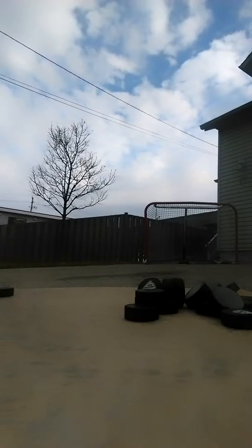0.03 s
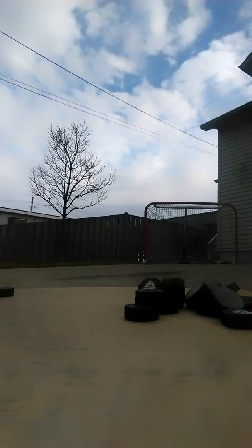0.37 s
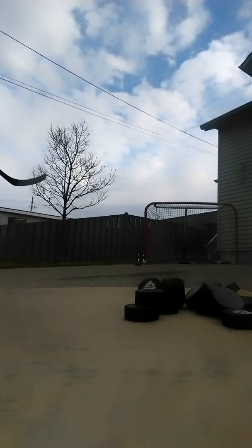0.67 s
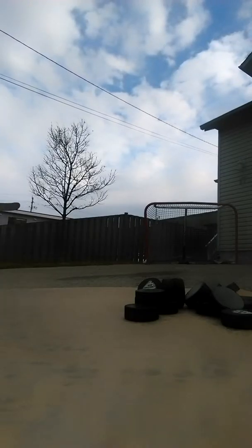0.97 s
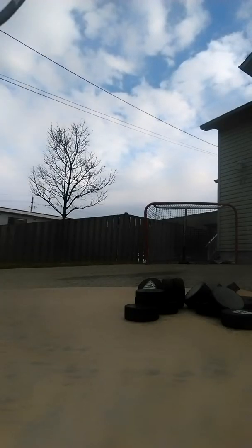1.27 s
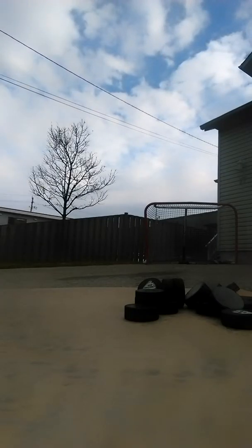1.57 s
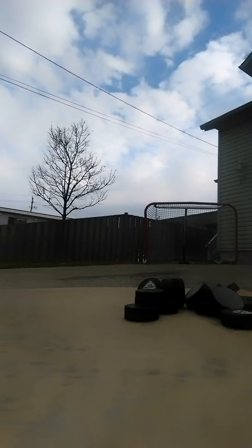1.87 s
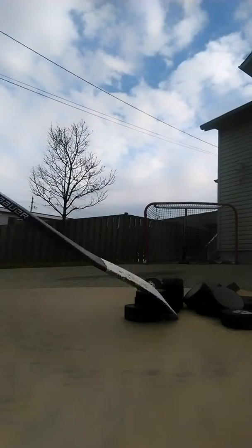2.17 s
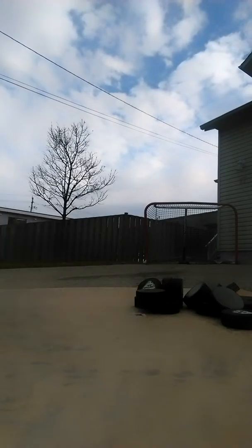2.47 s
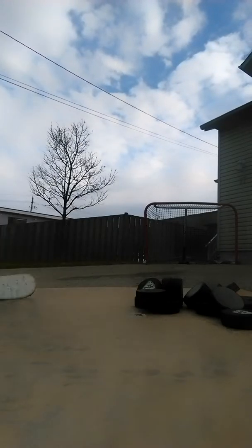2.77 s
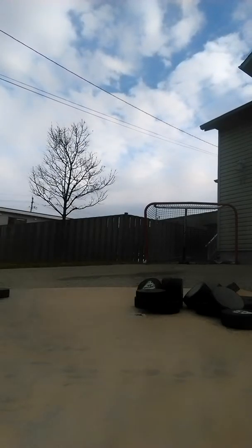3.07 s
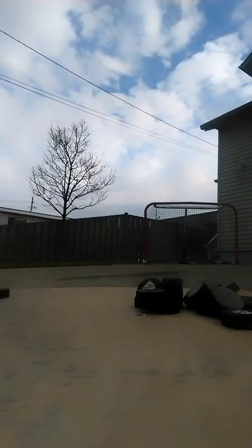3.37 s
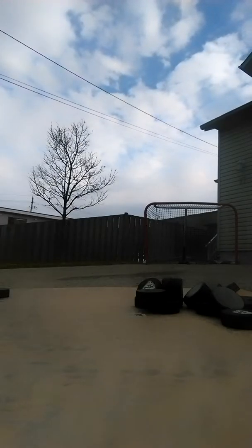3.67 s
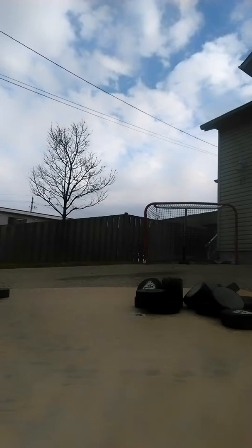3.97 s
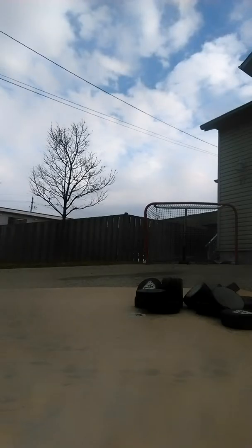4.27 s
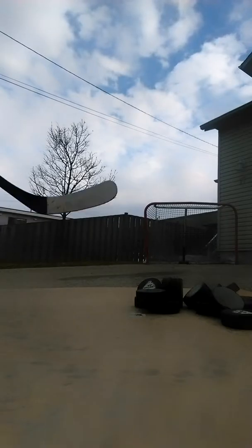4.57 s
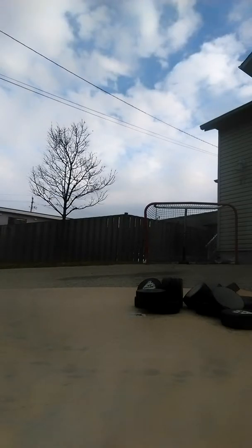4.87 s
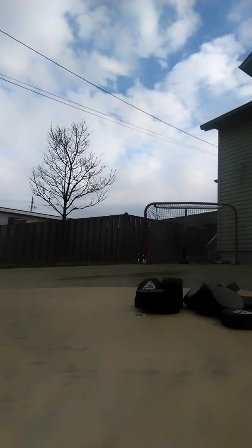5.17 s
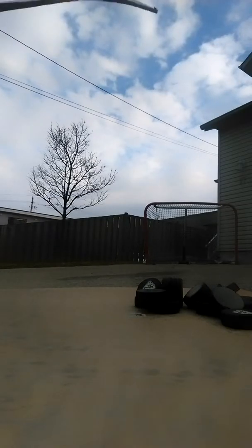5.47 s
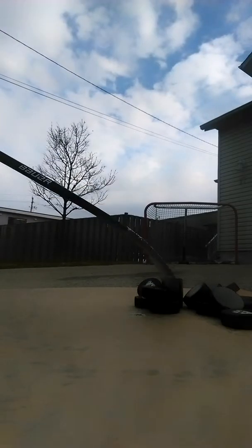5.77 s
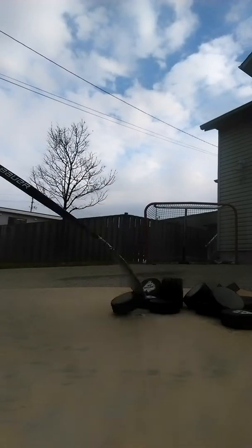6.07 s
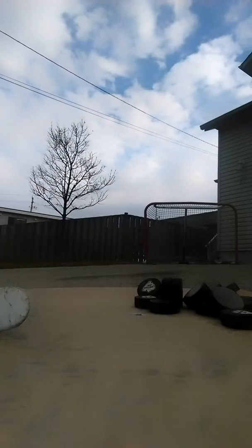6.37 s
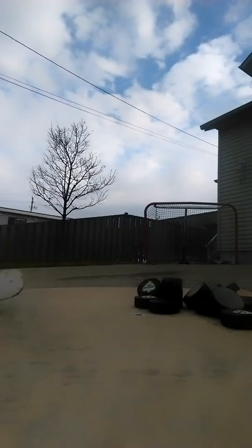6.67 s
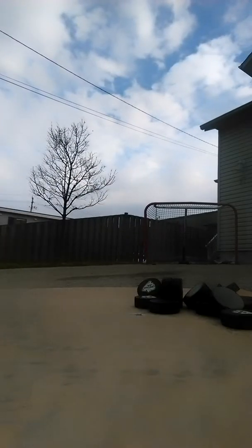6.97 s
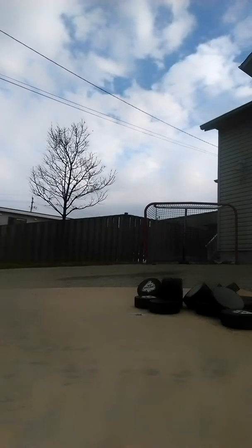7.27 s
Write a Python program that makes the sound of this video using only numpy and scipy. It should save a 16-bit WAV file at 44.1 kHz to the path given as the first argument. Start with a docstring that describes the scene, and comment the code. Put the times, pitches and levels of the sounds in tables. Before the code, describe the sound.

Heard from ground level in a fenced yard, a hockey stick fires two sharp slap shots a few seconds apart, each echoing briefly and followed by the clang of a puck on the steel goal. After each shot, the blade taps pucks off a pile with dull thuds and scrapes them across a shooting board. Sleeves rustle softly, while low town rumble, far traffic and a slight breeze lie underneath.

```python
"""Hockey practice in a fenced yard

Two microphones at ground level, beside a pile of pucks. Close up, the blade knocks pucks off the pile
and drags them over a shooting board on the concrete, while sleeves and gloves rustle. Two slap shots
crack and come back from house and fence; a stray puck clangs on steel. A light breeze stirs at the
microphones, over low town rumble and far traffic."""
import sys
import numpy as np
from scipy import signal
from scipy.fft import rfft, irfft
from scipy.io import wavfile
from scipy.ndimage import uniform_filter1d

SR = 44100
rng = np.random.default_rng(int(sys.argv[2]) if len(sys.argv) > 2 else 0)


def log_audio(samples):
    """Write samples as a 16-bit WAV file to the path given in sys.argv[1]."""
    # one column per channel
    frames = np.atleast_2d(samples).T
    # limit to full scale, then quantise
    limited = np.clip(frames, -1, 1)
    pcm = np.round(limited * 32767).astype(np.int16)
    wavfile.write(sys.argv[1], SR, pcm)


N = 327663
TIME = np.arange(N) / SR
SIZE = 8192  # samples in one short hit
HZ, AGE = np.fft.rfftfreq(SIZE, 1 / SR), np.arange(SIZE) / SR
IMPULSE = 1. * (AGE == 0)


def amp(db):
    """Decibels to gain."""
    return 10 ** (np.asarray(db) / 20)

def unit_rms(x):
    """Scales to rms 1."""
    return x / np.sqrt(np.mean(x ** 2) + 1e-20)

def unit_hit(x):
    """Scales to the energy of 10 ms at rms 1."""
    return x / np.sqrt(np.mean(np.sum(x ** 2, -1)) / (SR / 100) + 1e-20)

def spectrum(points, hz=HZ):
    """Reads a table on a log-frequency axis."""
    f, value = np.transpose(points)
    return np.interp(np.log(hz + 1), np.log(f), value)

def fader(points):
    """Gain over time from a table of levels."""
    return amp(np.interp(TIME, *np.transpose(points)))

def add(mix, start_s, sound):
    """Mixes a sound in."""
    part = mix[..., round(start_s * SR):][..., :sound.shape[-1]]
    part += sound[..., :part.shape[-1]]

def colour(x, db):
    """Causal filter with the gain db at the frequencies HZ."""
    log_gain = np.log(amp(np.r_[db, db[-2:0:-1]]))
    taps = np.fft.ifft(np.exp(signal.hilbert(log_gain).conj())).real[:SIZE // 2]
    return signal.fftconvolve(x, taps[None], axes=1)[:, :x.shape[1]]

def mic_noise(length, shared):
    """White noise at two microphones that share part of its power."""
    left, right, common = rng.standard_normal((3, length))
    return np.sqrt(shared) * common + np.sqrt(1 - shared) * np.array([left, right])

def whiten(x):
    """Evens out the broad colour of a burst and keeps its fine grain."""
    bins = rfft(x)
    return irfft(bins / np.sqrt(uniform_filter1d(abs(bins) ** 2, size=240) + 1e-12))

def wander():
    """An irregular sway, strongest at its slowest rates."""
    rates_hz = np.geomspace(.8, 14, 20)
    return unit_rms(sum(np.sin(2 * np.pi * (f * TIME + rng.random())) / np.sqrt(f) for f in rates_hz))

def snaps(per_s, spread_db, cap):
    """Sparse clicks, a few much louder than the rest."""
    clicks = rng.standard_normal(N) * (rng.random(N) < per_s / SR)
    return unit_rms(clicks * amp(spread_db * np.minimum(rng.exponential(1, N), cap)))


# Town air around the yard: f/Hz, level/dB
TOWN_SPECTRUM = [(15, -39), (25, -35.5), (75, -2.5), (188, -8), (209, -9), (267, -9), (421, -17),
                 (457, -14), (648, -21), (848, -18.5), (1080, -23), (1570, -23), (3530, -31),
                 (15500, -68.5)]

def town_rumble(level_db=-44, sway_db=2.5):
    """The town's low rumble, almost the same at both microphones."""
    rumble = unit_rms(colour(mic_noise(N, shared=.95), spectrum(TOWN_SPECTRUM)))
    return rumble * amp(level_db + sway_db * wander())


# Tyres in the distance: f/Hz, level/dB
TYRE_SPECTRUM = [(100, -11), (500, -3.5), (1100, 1), (1700, -7), (3500, -22), (9000, -41)]
# Their roar as it reaches the yard: t/s, level/dB
TRAFFIC_LEVELS = [(0, -41), (.3, -41), (1.2, -45.5), (1.6, -52), (2.8, -50.5), (4.8, -53), (5.6, -57.5),
                  (7.43, -57)]

def far_traffic():
    """Tyre roar far off, fading away."""
    return unit_rms(colour(mic_noise(N, shared=.56), spectrum(TYRE_SPECTRUM))) * fader(TRAFFIC_LEVELS)


# Air stirring right at the microphones: f/Hz, level/dB
BREEZE_SPECTRUM = [(20, -14), (45, 0.5), (75, -5), (160, -18.5), (500, -39.5)]

def breeze(level_db=-54, gust_db=3.5):
    """Light gusts buffet each microphone with its own low noise."""
    buffet = unit_rms(colour(mic_noise(N, shared=0), spectrum(BREEZE_SPECTRUM)))
    return buffet * amp(level_db - gust_db * wander())


def hollow_note(at_s=3.597, hz=332, level_db=-35, width_s=.02):
    """A faint, brief hollow note, dead centre."""
    swell = np.exp(-((TIME - at_s) / width_s) ** 2)
    return amp(level_db) * swell * np.sin(2 * np.pi * hz * TIME)


# Single echoes off house and fence: delay/s, level/dB
WALL_ECHOES = [(0.0626, -12), (.090, -13.5)]
# Decay of the yard's tail: f/Hz, t60/s
YARD_DECAY = [(150, 0.61), (1000, 1.05), (3000, .85), (7000, 0.56), (14000, 0.18)]
# Colour of all the yard sends back: f/Hz, level/dB
YARD_SPECTRUM = [(80, -13.5), (400, 4.5), (800, 2.5), (1500, 3), (2800, -2.5), (6000, -1), (14000, -10)]

def yard_echo(sent, first_s=.052, hold_s=.09, lumps_db=1.5):
    """The nearest wall answers late; fence boards and siding then scatter a long lumpy tail."""
    lumps = unit_rms(uniform_filter1d(rng.standard_normal(SR), size=150))
    reflections = mic_noise(SR, shared=.39) * (rng.random(SR) < .12) * amp(lumps_db * lumps)
    hz, age, bands = signal.stft(reflections, SR, nperseg=256)
    decay = amp(-60 * np.maximum(age - first_s - hold_s, 0) / spectrum(YARD_DECAY, hz)[:, None])
    tail = signal.istft(bands * decay, SR, nperseg=256)[1][:, :SR]
    tail *= np.where(TIME[:SR] < first_s, .15, 1)
    tail /= np.linalg.norm(tail[0])
    for delay, db in WALL_ECHOES:
        slap = mic_noise(SIZE, shared=.5) * np.exp(-AGE / .0013)  # rough siding smears each echo
        add(tail, delay, amp(db) * slap / np.linalg.norm(slap[0]))
    return colour(signal.fftconvolve(sent, tail, axes=1)[:, :N], spectrum(YARD_SPECTRUM))


# Cloth heard close up: f/Hz, level/dB
CLOTH_SPECTRUM = [(1000, -20), (3500, 2), (7000, 3.5), (10000, -5), (13000, 8.5), (15500, -1)]
# Sleeves and gloves as the stick is moved: t/s, level/dB
RUSTLE_LEVELS = [(0, -48), (.1, -78), (.39, -63), (.455, -40), (.5, -53), (1.1, -60), (1.45, -64),
                 (1.55, -57), (1.8, -62.5), (2.0, -62), (2.85, -65), (2.98, -57), (3.1, -69), (3.6, -65),
                 (3.76, -60), (3.88, -49.5), (4.25, -58), (4.35, -61), (4.55, -68), (4.68, -59), (4.8, -79),
                 (5.85, -69), (5.96, -49), (6.2, -48), (6.52, -44.5), (6.6, -54), (6.87, -57), (6.95, -72),
                 (7.43, -59.5)]

def sleeve_rustle(snap_gain=.37):
    """Brushing cloth gives a fine hiss with sparse little snaps."""
    brush = snap_gain * snaps(per_s=150, spread_db=5, cap=3) + mic_noise(N, shared=.1)
    return unit_rms(colour(brush, spectrum(CLOTH_SPECTRUM))) * fader(RUSTLE_LEVELS)


def shifting_resonances(x, depth_db=3.2):
    """Resonances come and go as the contact point moves."""
    bands = signal.stft(x, SR, nperseg=512)[2]
    patches = uniform_filter1d(rng.standard_normal(bands.shape[1:]), size=9, axis=0)
    patches = unit_rms(uniform_filter1d(patches, size=9, axis=1))
    return signal.istft(bands * amp(depth_db * patches), SR, nperseg=512)[1][:, :N]


# Grit under the blade: f/Hz, level/dB
SCRAPE_SPECTRUM = [(60, 6), (280, -10.5), (600, -4.5), (1200, -5), (2700, 2.5), (4200, -7.5), (6500, -11.5),
                   (8500, -11.5), (9600, -20), (10900, -24), (11900, -20), (15500, -8)]
# The blade dragging over the ground near the microphones: t/s, level/dB
DRAG_LEVELS = [(.36, -95), (.42, -58), (.47, -39), (.49, -87), (2.08, -93), (2.12, -58), (2.16, -43),
               (2.20, -25), (2.27, -26.5), (2.34, -28.5), (2.435, -31.5), (2.445, -59), (2.48, -37.5),
               (2.57, -35), (2.69, -39.5), (2.80, -47.5), (2.9, -73), (3.0, -114), (4.28, -95), (4.34, -42),
               (4.41, -62), (4.48, -90), (5.86, -93), (5.95, -48), (6.02, -56), (6.06, -35), (6.13, -37),
               (6.19, -42), (6.25, -34), (6.37, -33), (6.41, -38.5), (6.54, -44), (6.68, -48), (6.8, -70),
               (6.9, -95)]

def blade_drag(judder_db=1.3, rasp_db=-10, rasp_hz=10100):
    """Grit snaps under the sliding blade, which judders a little; the finest grains rasp high up."""
    grains = snaps(per_s=2000, spread_db=4, cap=4)
    judder = unit_rms(uniform_filter1d(uniform_filter1d(rng.standard_normal(N), size=400), size=200))
    contact = .7 * grains + mic_noise(N, shared=.15)
    rasp = signal.lfilter(*signal.iirpeak(rasp_hz, Q=5, fs=SR), contact)
    rub = unit_rms(colour(contact, spectrum(SCRAPE_SPECTRUM))) + amp(rasp_db) * unit_rms(rasp)
    return unit_rms(shifting_resonances(rub)) * fader(DRAG_LEVELS) * amp(judder_db * judder)


# Modes of the steel tube: f/Hz, level/dB, t60/s
STEEL_MODES = [(1098, 8, .55), (1065, -5, 1), (1143, 11, .35), (1185, -19, 0.31), (1232, 5, 0.31),
               (1320, -7, 0.28), (1466, 4, 0.32), (1728, -8, 0.84), (2950, -14, .18), (3090, -5, 0.81),
               (3220, -9, 0.27), (3730, -14, 0.48), (4151, -16, 0.29), (4500, -14, .2), (5710, -8, .22),
               (6340, -16, 0.24)]
# Puck on steel: t/s, level/dB
STEEL_HITS = [(.984, -21), (1.056, -23.5), (5.031, -15.5)]

def steel_clangs(onset_db=7, onset_t60=.29):
    """Struck steel, loud at first, then ringing on; each mode meets the microphones out of step."""
    t = TIME[:SR]
    onset = 1 + amp(onset_db - 60 * t / onset_t60)
    clangs = np.zeros((2, N))
    for start_s, level_db in STEEL_HITS:
        ring = np.zeros((2, SR))
        for hz, db, t60 in STEEL_MODES:
            phase = rng.random() + rng.random((2, 1)) / 2
            ring += amp(db - 60 * t / t60) * np.sin(2 * np.pi * (hz * t + phase))
        add(clangs, start_s, amp(level_db) * unit_hit(ring * onset))
    return clangs


# Low bass bumps as the slap shots overload the microphones: t/s, level/dB, left against right/dB
SHOT_BASS_BUMPS = [(0.475, -22, -12), (.498, -19, 0), (3.912, -32, 8), (3.936, -31, -15)]

def bass_bumps(rise_s=.0023):
    """Each bump is one slow swing of the signal, unequal left and right."""
    age = AGE / rise_s
    swing = unit_hit(age * (2 - age) * np.exp(-age))
    bumps = np.zeros((2, N))
    for start_s, db, left_db in SHOT_BASS_BUMPS:
        add(bumps, start_s, amp(db) * swing * amp([[left_db], [0]]))
    return bumps


# The shooting board, mostly in the right microphone: f/Hz, level/dB
BOARD_SPECTRUM = [(40, -51.5), (75, -11), (125, -2), (290, -2), (420, -5.5), (700, -12), (1400, -23.5),
                  (2250, -20), (2750, -25), (3250, -24), (4000, -36.5), (9000, -47)]

def board_thud(first_s=.00343, last_s=.067, edge_db=-9, t60=.4, left_db=-19, returns=9):
    """Bending waves in the board: highs outrun lows, and the edges send them round again."""
    delays = np.r_[first_s, rng.uniform(2 * first_s, last_s, returns)]  # travel times at 300 Hz
    gains = np.r_[1, amp(edge_db - 60 * delays[1:] / t60) * rng.choice([-1, 1], returns)]
    waves = gains @ np.exp(-4j * np.pi * delays[:, None] * np.sqrt(300 * HZ))
    return unit_hit(irfft(waves * amp(spectrum(BOARD_SPECTRUM)))) * amp([[left_db], [0]])


# Modes of the stick's blade: f/Hz, level/dB, t60/s
BLADE_MODES = [(426, -2, 0.037), (669, 1, 0.046), (914, 2.5, 0.056), (1324, 0.5, 0.074), (1528, 6, 0.039),
               (2253, 10, .02), (3314, 5.5, 0.027), (4260, 5, 0.014)]

def blade_ring(grit, detune=.082):
    """The struck blade rings, tuned a little differently each time; grit scatters the phases."""
    ring = np.zeros((2, SIZE))
    for hz, db, t60 in BLADE_MODES:
        cycles = hz * (1 + detune * rng.uniform(-.84, 1)) * AGE + grit * rng.random((2, 1))
        ring += amp(db - 60 * AGE / t60) * np.sin(2 * np.pi * cycles)
    return unit_hit(ring)


def tilt(db_per_octave):
    """Hard contacts are brighter than soft ones: dB at the frequencies HZ."""
    return db_per_octave * np.log2(np.maximum(HZ, 450) / 1500)


# The crack of a blow: f/Hz, level/dB
CRACK_SPECTRUM = [(40, -27), (150, -10.5), (400, -1), (900, 4.5), (1500, -0.5), (2700, 2.5), (4000, -9.5),
                  (6500, -17), (10000, -19.5), (15500, -22)]

def direct_crack(brightness, contact_s, grit, ring_db=-5, scatter_db=-11, scatter_t60=.09):
    """A clean push and a crunch of grit, with the blade's ring; things close by scatter the crack."""
    crunch = unit_hit(whiten(mic_noise(SIZE, shared=.18) * np.exp(-(AGE / contact_s) ** 2)))
    force = np.sqrt(grit) * crunch + np.sqrt(1 - grit) * unit_hit(IMPULSE)
    ring = amp(ring_db) * blade_ring(grit)
    scatter = unit_hit(mic_noise(SIZE, shared=.091) * amp(-60 * AGE / scatter_t60))
    crack = unit_hit(colour(force + amp(scatter_db) * scatter, spectrum(CRACK_SPECTRUM)))
    return unit_hit(colour(crack + ring, tilt(brightness)))

def radiated_crack(brightness):
    """The crack sent into the yard: summed over all directions, its spectrum is smooth."""
    return unit_hit(colour(IMPULSE[None], spectrum(CRACK_SPECTRUM) + tilt(brightness)))


# Knocks, cracks and scuffs of stick and puck, close by and farther off on net, fence or steel:
# t/s, level/dB, brightness/(dB per octave), contact/s, grit/0-1, board thud/dB, echo against level/dB
STICK_AND_PUCK_HITS = [(0.3299, -23.5, -4.5, 0.0021, 0.7, -50, -8.5),
                       (0.339, -23.5, -0.5, 0.0095, 0.75, -58, -12),
                       (0.3445, -27, 8, 0.0028, 0.87, -55, -15),
                       (0.4753, -10, 4.5, .004, 0.99, -20.5, -0.5),
                       (.481, -12.5, 0.5, 0.011, 0.9, -41, -30), (0.4975, -7, 1, 0.0019, 0.97, -24, -37),
                       (.5657, -20, -2, 0.0027, 0.46, -40, -16), (.623, -26.5, -3.5, 0.0017, 0.14, -35, -6),
                       (0.8613, -19, 1, 0.002, 0.96, -27.5, 3), (0.983, -19.5, -7, 0.012, 0.6, -42, -32),
                       (1.054, -22.5, -5, 0.0031, .8, -35, -29), (1.505, -36.5, 0, .002, 0.88, -59, -0.5),
                       (1.532, -36.5, 2, 0.014, 1, -56, -17), (1.5391, -29, 7.5, 0.0012, 0.97, -59, -25),
                       (2.0847, -16, 1, 0.0043, 0.8, -14, -14), (2.163, -25, -2.5, 0.0056, 1, -25, -29),
                       (2.170, -29, -7, .003, 0.2, -14.5, -33), (2.204, -24.5, -1, 0.0034, 1, -11.5, -30),
                       (2.262, -33, 2, 0.0011, 1, -19.5, -24), (2.4373, -18.5, -5, 0.0012, 0.88, -54, -12),
                       (2.467, -38, -15, 0.0045, 1, -35, -3), (2.483, -30.5, -2, 0.0024, 0.9, -30.5, -20),
                       (2.520, -29, -6.5, 0.013, 1, -32, -7.5), (2.687, -28, 0, 0.024, 1, -34, -11.5),
                       (3.158, -45, 1, 0.00078, 0.3, -65, -10), (3.749, -27, -2.5, 0.022, 1, -44, -24),
                       (3.763, -22.5, 0.7, 0.022, 0.86, -36, -11),
                       (3.9128, -10, 2.7, 0.0015, 0.99, -20, -5), (3.935, -17.5, 2, 0.002, 0.77, -31, -12),
                       (4.062, -28, -5.5, .003, 0.06, -35, -15), (4.24, -34, 3.5, 0.0072, .9, -30.5, -1),
                       (4.332, -38, 8.5, 0.0044, .9, -57, -6), (4.380, -30, -1.5, 0.042, 0.9, -43, -20),
                       (4.469, -42, 0.5, .003, 0.63, -60, -19), (4.640, -30.5, -1, 0.041, 1, -51, -25),
                       (4.678, -26.5, -1, 0.021, 0.84, -44, -35), (4.968, -39.5, 0, .001, 1, -60, -20),
                       (4.983, -46.5, 7, 0.00065, 1, -65, -17), (5.0309, -18.5, 1.5, 0.048, 1, -60, -13.5),
                       (5.358, -41.5, -9, 0.011, .9, -57, -20),
                       (5.6856, -15, -0.5, 0.0038, 0.62, -13, -25.5),
                       (5.724, -42, 2.5, 0.0087, 1, -28.5, -24), (5.779, -34, -5.5, 0.0026, 0.65, -25, -19),
                       (6.02, -17, -0.5, 0.0037, 0.9, -12, -34), (6.047, -31, -2, 0.0027, 1, -24.5, -24),
                       (6.0834, -16.5, 3, 0.0022, 0.8, -17.5, -17.5),
                       (6.115, -31, 5.5, 0.0087, 1, -27, -27), (6.3852, -16, -6.5, .001, 0, -19.5, -31),
                       (6.424, -37, -7, 0.017, 1, -29.5, -27), (6.8909, -42.5, 0, 0.0024, 0.5, -64, -1)]

def stick_and_puck():
    """Each hit cracks and thuds; returns the direct sound and what goes out to the yard."""
    direct, sent = np.zeros((2, 2, N))
    for start_s, db, brightness, contact_s, grit, thud_db, echo_db in STICK_AND_PUCK_HITS:
        add(direct, start_s, amp(db) * direct_crack(brightness, contact_s, grit))
        add(direct, start_s, amp(thud_db) * board_thud())
        add(sent, start_s, amp(db + echo_db) * radiated_crack(brightness))
    return direct, sent


def scene(clang_echo_db=-19, left_lag_samples=10):
    """The practice from beside the pile, with the yard's echo and the open air behind it."""
    hits, sent = stick_and_puck()
    clangs = steel_clangs()
    direct = hits + clangs + bass_bumps() + blade_drag() + sleeve_rustle()
    direct[0] = np.roll(direct[0], left_lag_samples)  # it reaches the right microphone first
    echo = yard_echo(sent + amp(clang_echo_db) * clangs)
    return direct + echo + town_rumble() + breeze() + far_traffic() + hollow_note()


# Response of the left microphone against the right: f/Hz, level/dB
LEFT_MIC_RESPONSE = [(100, -1.5), (1300, -1.5), (2400, -7.5), (4000, -8), (7000, 1.5), (10200, 5),
                     (12000, -3), (15000, -20.5)]

def record(dry, ceiling=.92, edge_hz=16000):
    """The left microphone has its own colour; the hardest cracks overload; the top treble is cut."""
    mics = np.vstack([colour(dry[:1], spectrum(LEFT_MIC_RESPONSE)), dry[1:]])
    squashed = ceiling * np.tanh(mics / ceiling)
    lowpass = signal.firwin(511, edge_hz, window=("kaiser", 9), fs=SR)
    return signal.oaconvolve(squashed, lowpass[None], "same")


dry = scene()
out = record(dry)
log_audio(out)
```